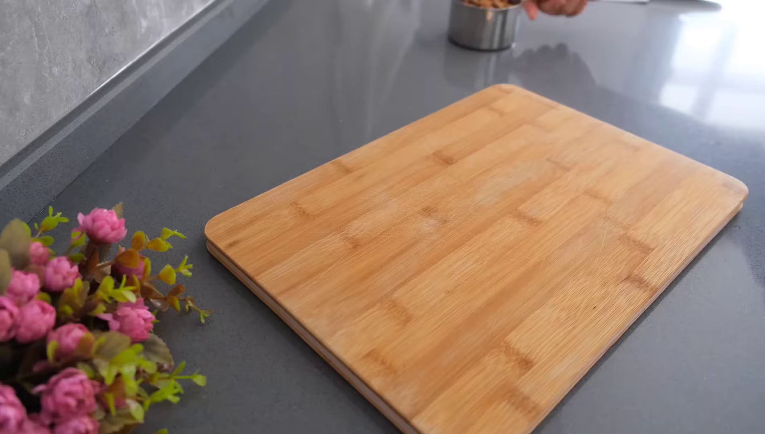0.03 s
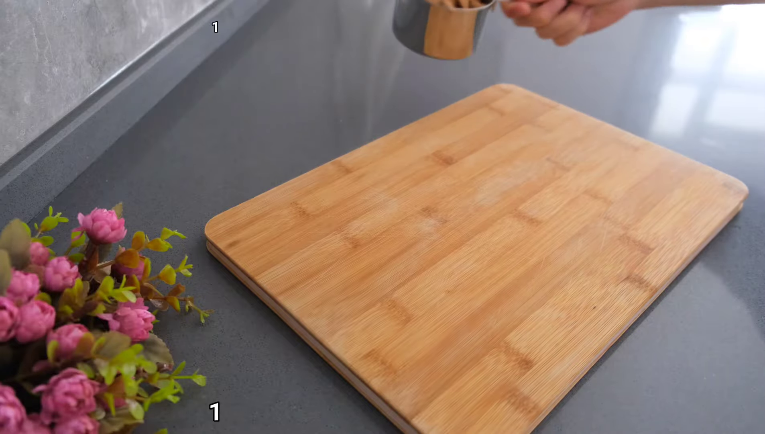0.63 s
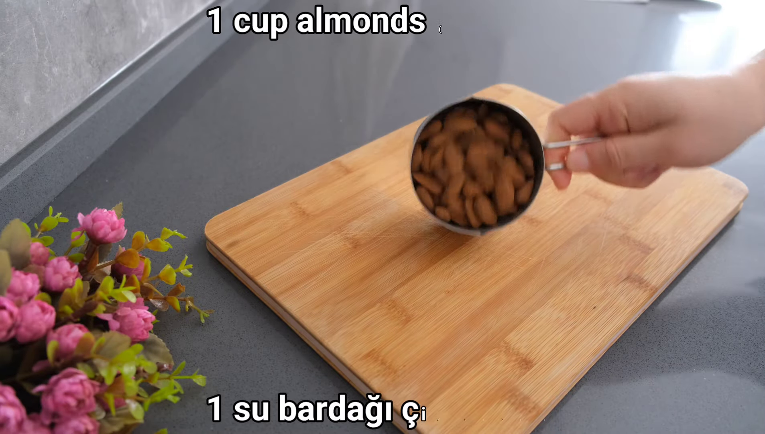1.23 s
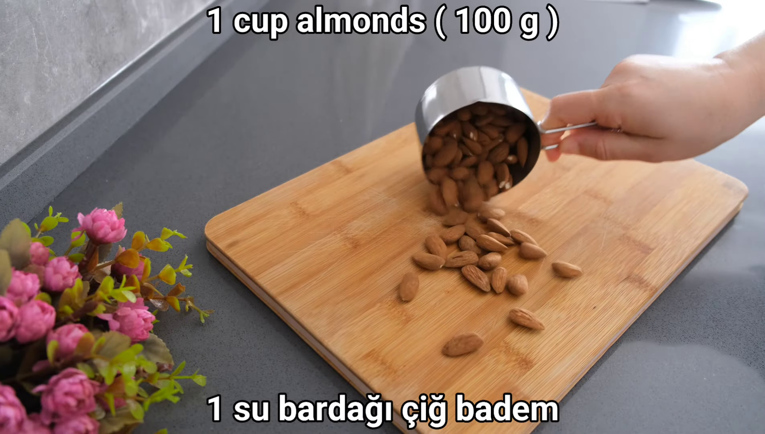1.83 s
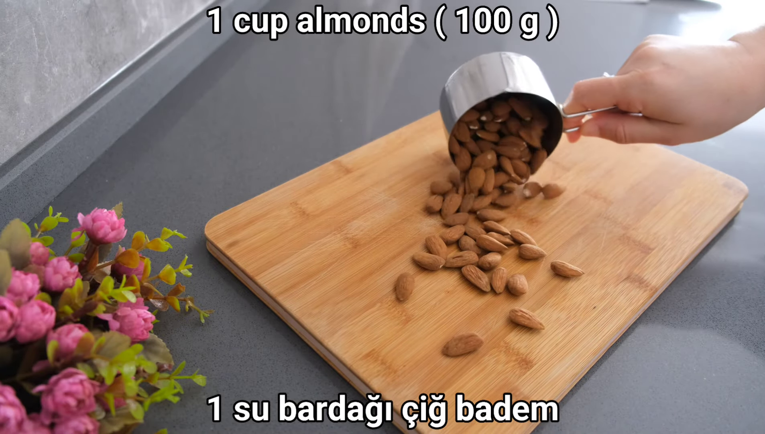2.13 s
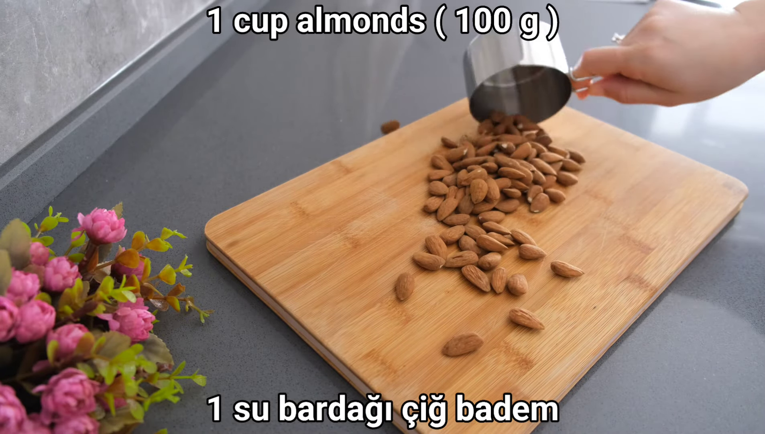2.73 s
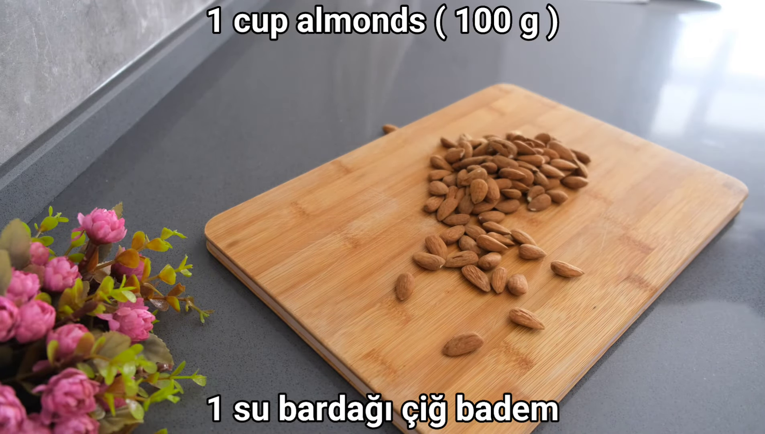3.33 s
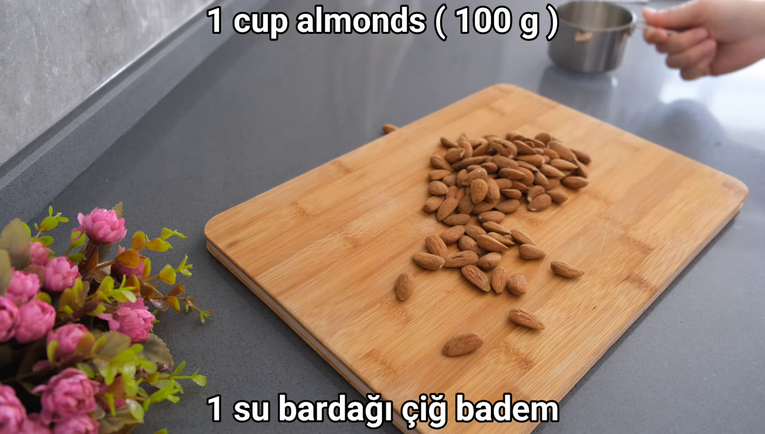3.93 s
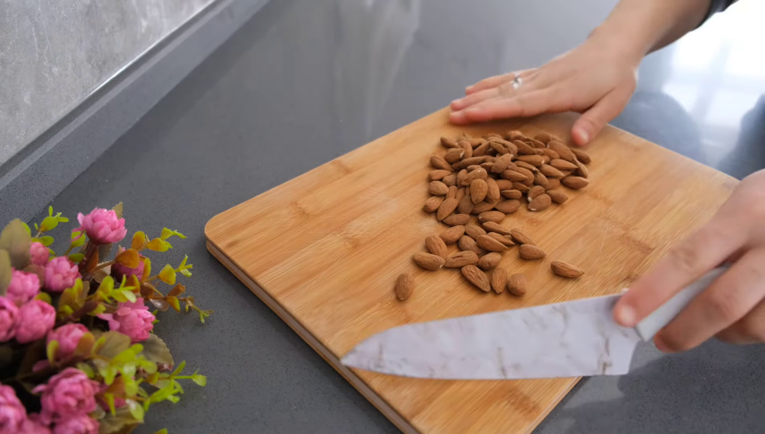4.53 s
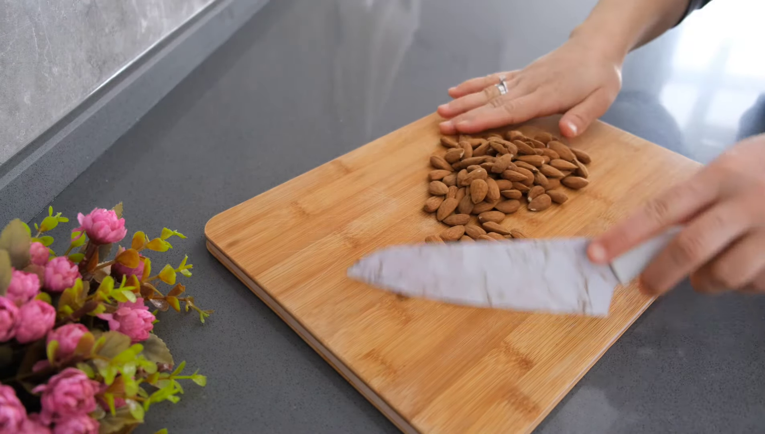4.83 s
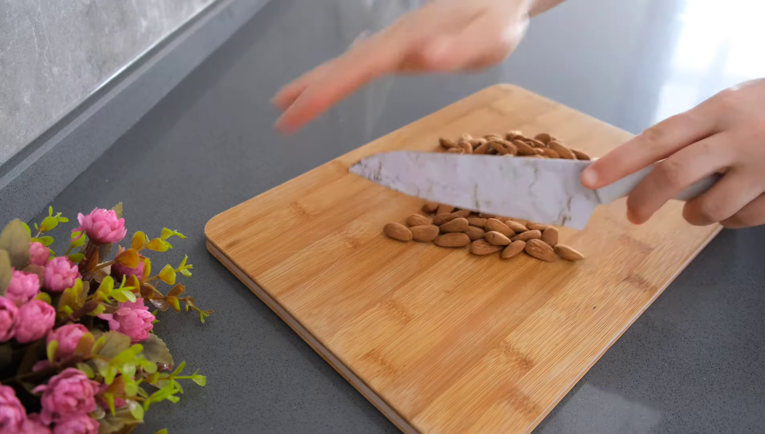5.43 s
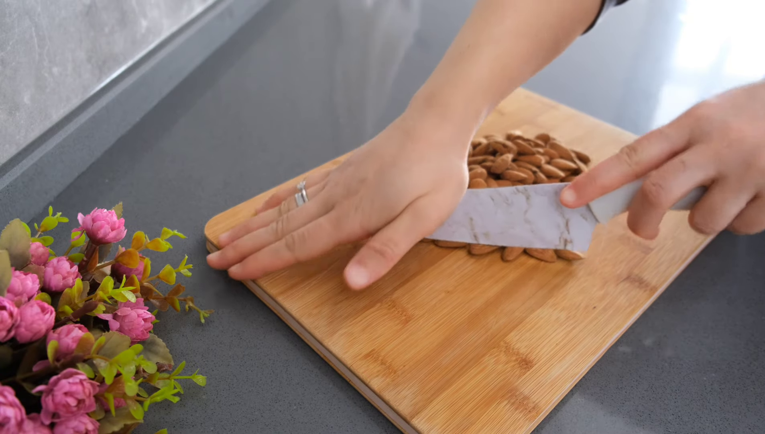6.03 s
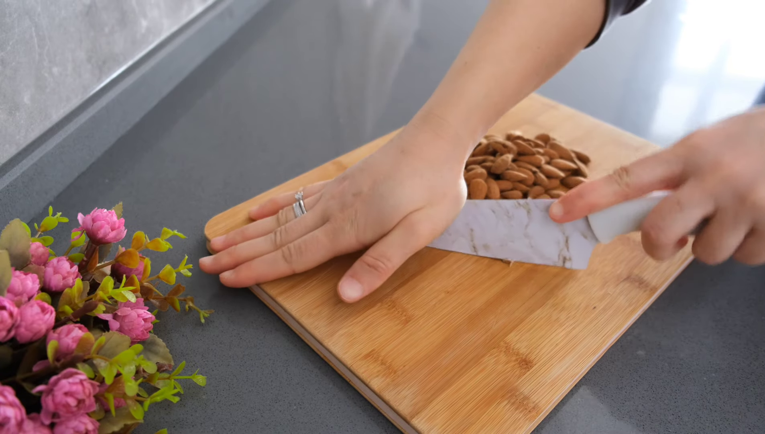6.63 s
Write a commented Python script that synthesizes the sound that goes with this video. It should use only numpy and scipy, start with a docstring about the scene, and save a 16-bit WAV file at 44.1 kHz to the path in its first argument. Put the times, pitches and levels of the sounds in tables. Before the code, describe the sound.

Almonds clatter from a steel cup onto a wooden board, the cup clinks down loudly, and a knife scrapes and presses the nuts.

```python
"""Almonds pour from a steel measuring cup onto a bamboo board, each impact exciting the board's modes.
First the full cup slides off a stone counter and knocks on the board; its rim sings by stick-slip friction.
Set down empty, it rings with a loud clink that overloads the close stereo microphone. A hand lands on the
board, then a knife blade sweeps the nuts together and is pressed flat on them, so that they grind and
crackle. Beneath it all are the air, soft worktop booms and short reverberation of a small kitchen."""
import sys
import numpy as np
from scipy import signal
from scipy.fft import rfft, irfft
from scipy.io import wavfile
from scipy.ndimage import uniform_filter1d

SR = 44100
rng = np.random.default_rng(int(sys.argv[2]) if len(sys.argv) > 2 else 0)


def master(y):
    """Save y as 16-bit WAV."""
    cut = np.clip(np.atleast_2d(y).T, -1, 1)
    pcm = np.round(cut * 32767)  # scale
    wavfile.write(sys.argv[1], SR, pcm.astype(np.int16))


N = 295470
TIME = np.arange(N) / SR

# Modes of the bamboo board and of the steel cup. Each row: frequency in Hz, level in dB, T60 in seconds.
BOARD = [(115, -1, 0.29), (171, -7, 0.26), (237, 0, 0.17), (274, -2, 0.26), (329.8, -1.5, 0.35),
         (396.5, -9, 0.33), (463, -11, 0.14), (679, 2.5, 0.081), (877, -0.5, 0.12), (933.6, -1, 0.17),
         (1190, -7.5, 0.07), (1523, 5.5, 0.081), (1684, 5.5, 0.036), (1900, -4, 0.085), (2290, -1.5, 0.052),
         (2492, -0.5, 0.047), (2900, -7, 0.085), (3460, 0.5, 0.04)]
CUP = [(988, -13, .6), (1055, -1, .8), (1076, -6, .8), (1330, -11, .65), (1593, -15, .55), (1858, -12, .7),
       (1886, -10, .85), (2966, -4, .85), (2996, -10, .7), (3908, -18, .75), (4371, -20, .55),
       (5432, -12.5, .7), (5600, -20, .5), (6045, -18, .58), (7251, -19, .46), (7903, -19, .55),
       (8818, -27, .5), (9372, -18, .35), (10240, -25, .42), (11080, -24, .35), (11910, -28, .45),
       (12330, -26, .42)]
# Contact noise spectra of wood, tumbling nuts and steel. Each row: frequency in Hz, level in dB.
WOOD = [(100, -2), (500, 4), (900, 9), (1250, 1.5), (1600, 4), (3300, 2.5), (5000, -4), (7500, -5),
        (10000, -10), (15000, -39)]
TUMBLE = [(100, -30), (480, -7.5), (900, 9), (1250, -1), (1600, 3), (3200, -6), (5000, -20), (8000, -17),
          (15000, -31)]
STEEL = [(2000, 5), (4500, 2), (7500, -6.5), (9800, -10.5), (12000, -10.5), (15500, -19)]
# Stereo width at the microphone. Each row: frequency in Hz, level of side relative to mid in dB.
WIDTH = [(40, -20.5), (200, -12), (1100, -11.5), (2200, -5), (4000, -0.5), (8000, 0)]
# The cup's base meets the counter and chatters. Each row: start in seconds, peak level in dB.
CLINKS = [(4.0811, 3), (4.0841, 3.5), (4.0871, 0), (4.098, -15), (4.111, -14)]

TRICKLE_START_S, EMPTY_S, PILE_SETTLE_S = 1.46, 3.04, 0.18
SET_DOWN_S, SEAT_S = CLINKS[0][0], 6.134  # the cup lands on the stone; the blade seats on the nuts


def amp(db):
    """Decibels to amplitude ratio."""
    return 10 ** (np.asarray(db) / 20)


def unit(x):
    """Normalisation to unit energy."""
    return x / np.sqrt(np.sum(x ** 2))


def colour(x, spectrum, size=4096):
    """Minimum-phase filter through (Hz, dB) points, built by folding the cepstrum."""
    hz, db = np.transpose(spectrum)
    grid = np.linspace(1, SR / 2, size // 2 + 1)
    gain = amp(np.interp(np.log(grid), np.log(hz), db))
    cepstrum = irfft(np.log(gain))
    response = irfft(np.exp(rfft(2 * cepstrum[:size // 2], size) - cepstrum[0]))
    return signal.fftconvolve(x, response[None], axes=1)[:, :x.shape[1]]


def band(x, low_hz, high_hz, order=2):
    """Band limiting by a high-pass and a low-pass in cascade."""
    for hz, kind in ((low_hz, "high"), (high_hz, "low")):
        x = signal.lfilter(*signal.butter(order, min(hz, SR / 2 - 1000), kind, fs=SR), x)
    return x


def noise(count):
    """Partly coherent stereo noise: alike in the bass, unrelated in the treble."""
    mid, side = rng.standard_normal((2, 1, count))
    side = colour(side, WIDTH, size=512)
    return np.vstack([mid + side, mid - side])


def wander(t, per_s):
    """Slow random modulation with a spread near 1, turning per_s times a second."""
    turns = rng.standard_normal(2000)
    return np.interp(t * per_s, np.arange(len(turns)), turns)


def crack(spectrum, t60, count=5000):
    """Contact transient: a burst of coloured noise with exponential decay."""
    burst = noise(count) * amp(-60 * TIME[:count] / t60)
    return unit(colour(burst, spectrum, size=1024))


def ring(modes, scatter_db=3, damping=1, count=5000):
    """Modal superposition: damped sinusoids, weighted anew by every point of contact."""
    hz, db, t60 = np.transpose(modes)
    strength, polarity, side = rng.standard_normal((3, len(hz)))
    # high modes reach the two channels out of phase
    phase = np.sign(side) * np.arctan(amp(np.interp(hz, *np.transpose(WIDTH))))
    weights = np.sign(polarity) * amp(db + scatter_db * strength) * np.exp(1j * np.outer([1, -1], phase))
    poles = 2j * np.pi * hz - np.log(1000) * damping / t60
    decays = np.vander(np.exp(poles / SR), count, increasing=True)
    return unit((weights @ decays).imag)


def detuned(modes, share):
    """Loading shifts each natural frequency by a small random fraction."""
    return [(hz * (1 + share * rng.standard_normal()), db, t60) for hz, db, t60 in modes]


def stroke(s, hold_s, db, attack_s, release_s):
    """Envelope in dB: it gains 20 dB per attack_s up to time s, holds, then loses 20 dB per release_s."""
    rise, fall = (s - TIME) / attack_s, (TIME - s - hold_s) / release_s
    return db - 20 * np.maximum(np.maximum(rise, fall), 0)


def add(out, s, sound, peak_db):
    """Superposition: mix a sound in at time s, its mid signal peaking at peak_db."""
    start = int(s * SR)
    part = sound[:, :max(N - start, 0)]
    out[:, start:start + part.shape[1]] += part * amp(peak_db) / np.abs(sound.mean(0)).max()


def follow(x, level_db, window=2200):
    """Gain control: the running RMS of a sound follows a level in dB."""
    power = np.abs(uniform_filter1d(np.mean(x ** 2, axis=0), window))
    return x * amp(level_db) / np.sqrt(power + power.max() * 1e-5)


def grains(voice, level_db, per_s, spread_db, spots=5, window=2200, patchy_db=0, shifts_per_s=16):
    """Shot noise: tiny random contacts at several spots, each with its own voice, follow a level in dB."""
    start, end = np.flatnonzero(level_db > level_db.max() - 45)[[0, -1]]
    span, count = slice(start, end), end - start
    out = np.zeros((2, N))
    for _ in range(spots):
        at = np.flatnonzero(rng.random(count) < per_s / spots / SR)
        strength_db = spread_db * np.minimum(rng.exponential(size=len(at)), 4)
        drift_db = patchy_db * wander(TIME[at], shifts_per_s)  # lets the spots take turns
        clicks = np.zeros((1, count))
        clicks[0, at] = amp(strength_db + drift_db)
        out[:, span] += signal.fftconvolve(clicks, voice(), axes=1)[:, :count]
    out[:, span] = follow(out[:, span], level_db[span], window)
    return out


def room_air(level_db=-50.5):
    """Stationary noise: the air of the room, strongest in the bass."""
    # Spectrum of the air. Each row: frequency in Hz, level in dB.
    spectrum = [(15, -39.5), (25, -4), (54, -0.5), (191, -15), (286, -10), (363, -18), (588, -17.5),
                (769, -19), (1120, -20.5), (1390, -22.5), (15000, -50.5)]
    air = colour(noise(N), spectrum)
    return amp(level_db) * air / air.std()


def worktop_booms():
    """Structure-borne sound: the worktop booms dully as the cook moves."""
    # Swells of the worktop. Each row: time of full level in seconds, hold in seconds, level in dB.
    booms = [(0.164, 0.11, -41), (0.693, 0.11, -34.5), (0.966, 0.087, -35.5), (1.25, 0.027, -39.5),
             (2.79, 0.028, -39.5), (6.23, 0.03, -42.5), (6.403, 0.21, -50)]
    # Their spectrum. Each row: frequency in Hz, level in dB.
    spectrum = [(20, -65), (42, -17.5), (54, 7), (66, -10.5), (110, -13.5), (170, -32), (400, -87)]
    swells = [stroke(s, hold, db, attack_s=0.048, release_s=0.21) for s, hold, db in booms]
    return follow(colour(noise(N), spectrum), np.max(swells, axis=0))


def kitchen(dry, wet_db, low_hz=150, high_hz=5500, treble_hz=4000, body_t60=0.52, treble_t60=0.14):
    """Reverberation: hard walls close by add a short diffuse tail whose treble dies first."""
    t = TIME[:24000]
    echoes = noise(len(t))
    body = band(echoes, low_hz, treble_hz, order=1) * amp(-60 * t / body_t60)
    treble = band(echoes, treble_hz, high_hz, order=1) * amp(-60 * t / treble_t60)
    tail = band(body, low_hz, high_hz, order=1) + treble
    return dry + amp(wet_db) * signal.fftconvolve(dry, unit(tail), axes=1)[:, :N]


def knife_sweep(sweep_s=4.742, hold_s=0.32, gather_db_per_s=23):
    """Sliding friction: the edge stutters over the wood, and the blade's hiss grows as it gathers nuts."""
    # Modes of the blade. Each row: frequency in Hz, level in dB, T60 in seconds.
    blade_modes = [(2260, 3.5, 0.011), (3170, 0.5, 0.019), (4560, -3.5, 0.012), (5980, -7, 0.027),
                   (6350, -5, 0.026), (7650, -5, 0.008), (9600, -6, 0.018), (11530, -9.5, 0.017),
                   (13500, -7.5, .008), (15000, -14, .012)]

    def edge():
        return band(ring(BOARD) + amp(2) * crack(WOOD, t60=0.061), 237, 2840)

    def blade():
        # pitch and colour shift with the point that touches
        ringing = ring(detuned(blade_modes, 0.016), scatter_db=1.5)
        hiss = band(crack(WOOD, t60=0.032), 2450, 13900)
        return ringing + amp(-2) * hiss

    edge_db = stroke(sweep_s, hold_s, db=-37.5, attack_s=0.19, release_s=0.16)
    blade_db = stroke(sweep_s, hold_s, db=-42.5, attack_s=0.12, release_s=0.073)
    blade_db += gather_db_per_s * np.clip(TIME - sweep_s, 0, hold_s)
    return (grains(edge, edge_db, per_s=700, spread_db=3, patchy_db=2.5)
            + grains(blade, blade_db, per_s=2800, spread_db=1, spots=7, patchy_db=4.5))


def knife_press(seat_hold_s=0.072, attack_s=0.029, release_s=0.037, skin_fade_s=0.055):
    """Friction under load: the flat blade rubs into place, the nuts grind and their skins crackle."""
    # Modes of the blade lying on the nuts. Each row: frequency in Hz, level in dB, T60 in seconds.
    loaded_modes = [(294, -1, .07), (876, 5, 0.021), (1576, 4.5, .026), (2130, -9, .03),
                    (3270, -5.5, 0.022)]
    # Pushes of the palm. Each row: time in seconds, hold in seconds, grinding in dB, crackling in dB.
    pushes = [(6.397, 0.0087, -40, -58.5), (6.478, 0.024, -50, -55), (6.583, 0.026, -36.5, -52.5)]

    def blade():
        return ring(loaded_modes, scatter_db=0.5)

    def crunch():
        return band(ring(BOARD, damping=4.4) + crack(WOOD, t60=0.04), 172, 1800)

    def skin():
        return band(crack(STEEL, t60=0.026), 3500, 16000, order=1)

    seating_db = stroke(SEAT_S, seat_hold_s, -40.5, attack_s, release_s)
    seating_skins_db = stroke(SEAT_S, seat_hold_s, -57, skin_fade_s, skin_fade_s)
    # the hand keeps leaning on the blade between pushes
    leaning_db = stroke(SEAT_S, pushes[-1][0] - SEAT_S, -53.5, attack_s, release_s)
    grinds = [stroke(s, hold, db, attack_s, release_s) for s, hold, db, _ in pushes]
    crackles = [stroke(s, hold, db, skin_fade_s, skin_fade_s) for s, hold, _, db in pushes]
    grinding_db = np.max(grinds + [leaning_db], axis=0)
    skins_db = np.max(crackles + [seating_skins_db], axis=0)
    return (grains(blade, seating_db, per_s=830, spread_db=2.5, spots=3, window=900)
            + grains(crunch, grinding_db, per_s=700, spread_db=3.5, window=900)
            + grains(skin, skins_db, per_s=920, spread_db=-6))


def cup_slide(slide_s=0.236, hold_s=0.22, db=-49, lift_off_db=4.5, attack_s=0.13, release_s=0.027):
    """Roughness noise: the full cup rasps over the stone and drags harder just as it lifts off."""
    # Spectrum of steel sliding on stone. Each row: frequency in Hz, level in dB.
    spectrum = [(290, -46), (500, -16), (990, -10), (1060, 3), (1160, -16), (1260, 2), (3270, -23),
                (5860, -22), (15000, -28.5)]
    drawn_db = stroke(slide_s, hold_s, db, attack_s, release_s)
    lifted_db = stroke(slide_s + hold_s, 0, db + lift_off_db, attack_s, release_s)
    level_db = np.maximum(drawn_db, lifted_db)
    return grains(lambda: crack(spectrum, t60=0.025), level_db, per_s=1500, spread_db=-2)


def cup_clink(clack_t60=0.023, split_hz=13, still_s=4.43, still_t60=0.17):
    """Free vibration after impact: the empty cup clacks down, rings and rattles until it lies flat."""
    # Spectrum of a clack on stone. Each row: frequency in Hz, level in dB.
    stone = [(80, -21), (300, -14), (550, -17.5), (780, -14), (1050, 5), (1400, 1), (2100, -2),
             (3000, -7.5), (4000, -21.5), (6000, -23), (9000, -31), (15000, -35)]

    def choked(damping):
        # contact with the stone damps the cup's modes
        return band(ring(CUP, scatter_db=2.5, damping=damping), 400, 4500, order=1)

    def rattle():
        return choked(damping=14) + amp(-4) * crack(stone, clack_t60)

    out = np.zeros((2, N))
    for s, db in CLINKS:
        add(out, s, crack(stone, clack_t60) + amp(-6) * choked(damping=15), db)
    # the handle splits every mode into a close pair that beats
    twins = [(hz + split_hz * (0.5 + rng.random()), db - 8, t60) for hz, db, t60 in CUP]
    add(out, SET_DOWN_S, ring(CUP + twins, scatter_db=0, count=24000), peak_db=-15.5)
    rattle_db = stroke(CLINKS[2][0], hold_s=0, db=-33.5, attack_s=0.002, release_s=0.43)
    out += grains(rattle, rattle_db, per_s=600, spread_db=2, spots=3)
    return out * amp(-60 * np.maximum(TIME - still_s, 0) / still_t60)


def rim_squeaks(pitch_hz=1064, waver_hz=9, roughness=0.12):
    """Stick-slip friction wavers around the cup's lowest strong mode; the load of nuts soon damps it."""
    # The rim catches on wood and nuts. Each row: start in seconds, peak level in dB, length in seconds.
    rubs = [(1.91, -23.5, 0.011), (1.957, -25, 0.079), (2.028, -23, 0.025), (2.119, -19, 0.0021),
            (2.521, -24.5, 0.017), (2.55, -30, 0.057), (2.608, -20, 0.013), (2.779, -25.5, 0.025),
            (2.85, -17, 0.027), (2.876, -17.5, 0.01), (2.9, -23.5, 0.0069)]
    out = np.zeros((2, N))
    for s, db, length in rubs:
        swell = np.hanning(int(length * SR))
        hz = pitch_hz + waver_hz * wander(TIME[:len(swell)], per_s=43)
        tone = np.sin(2 * np.pi * np.cumsum(hz) / SR)
        force = swell * (tone + roughness * rng.standard_normal(len(swell)))
        add(out, s, signal.fftconvolve(force[None], ring(CUP, damping=8), axes=1), db)
    return out


def board_knocks(free_damping=1.25, held_damping=1.8, tick_db=-28, tap_edge_ratio=1.06):
    """Long contacts excite low modes: cup, hand and blade knock on the board, each with a small tick."""
    # Heavy blows. Each row: start in seconds, peak level in dB, lower and upper band edges in Hz.
    blows = [(1.2544, -7.5, 626, 1300), (1.2591, -14, 474, 1050), (2.794, -29, 90, 253),
             (4.6052, -19, 372.4, 990), (4.607, -19, 168, 570), (5.83, -37.5, 150, 1520),
             (6.2239, -17, 520, 1650), (6.229, -37, 80, 170), (6.41, -36.5, 80, 200),
             (6.394, -34.5, 120, 1840)]
    # Hard first touches of steel on wood. Each row: start in seconds, peak level in dB, pitch in Hz.
    taps = [(1.2546, -19, 2060), (4.6058, -34.5, 3100), (6.2238, -41, 2050)]
    out = np.zeros((2, N))
    for s, db, low_hz, high_hz in blows:
        damping = held_damping if s > SET_DOWN_S else free_damping  # a resting hand damps the board
        hit = ring(BOARD, scatter_db=2.5, damping=damping) + amp(-5) * crack(WOOD, t60=0.075)
        add(out, s, band(hit, low_hz, high_hz, order=4), db)
        add(out, s, crack(WOOD, t60=0.081), db + tick_db)
    for s, db, hz in taps:
        tap = band(crack(WOOD, t60=0.04), hz / tap_edge_ratio, hz * tap_edge_ratio, order=6)
        add(out, s, tap, db)
    return out


def flow_levels(hold_s=0.0067, trickle_db=-40.5, tip_attack_s=0.19):
    """Granular flow comes in batches over a trickle: envelopes in dB of tumbling, skidding and rustling."""
    # Each tip or shake of the cup lets go a batch. Each row: time of its height, build-up and settling
    # in seconds, tumbling level in dB, skidding level in dB.
    batches = [(1.375, 0.046, 0.04, -35, -29.5), (1.403, 0.016, 0.035, -43, -29),
               (1.61, 0.16, 0.54, -29.5, -40), (1.911, 0.022, 0.55, -33, -31),
               (2.424, 0.17, 0.31, -27.5, -30), (2.755, 0.1, 0.42, -35.5, -37.5),
               (2.872, 0.069, 0.13, -29, -38.5)]
    trickle = stroke(TRICKLE_START_S, EMPTY_S - TRICKLE_START_S, trickle_db, 0.1294, PILE_SETTLE_S)
    tumbles = [stroke(s, hold_s, db, build_s, settle_s) for s, build_s, settle_s, db, _ in batches]
    skids = [stroke(s, hold_s, db, build_s, release_s=0.082) for s, build_s, _, _, db in batches]
    tumbling_db = np.max(tumbles + [trickle], axis=0)
    # tumbling and rustle rise as the cup tips and die away once it is empty
    tip_s = batches[0][0]
    ceiling_db = stroke(tip_s, EMPTY_S - tip_s, tumbling_db.max(), tip_attack_s, PILE_SETTLE_S)
    rustle_share_db = stroke(tip_s, EMPTY_S - tip_s, -12, tip_attack_s, release_s=0.15)
    return np.minimum(tumbling_db, ceiling_db), np.max(skids, axis=0), tumbling_db + rustle_share_db


def almond_stream(tumbling_db, skidding_db, rustle_db):
    """Dense collisions merge into noise: nuts tumble on wood, rustle their skins and skid down steel."""
    # Modes of the cup's wall, damped by nuts. Each row: frequency in Hz, level in dB, T60 in seconds.
    wall_modes = [(2955, 4.5, 0.027), (4650, -3, 0.03), (6170, -9, 0.03), (7260, 1, 0.062),
                  (7570, 5.5, 0.057), (8810, -3.5, 0.065), (10770, -11, 0.036), (12540, -7, 0.025)]

    def tumble():
        click = crack(TUMBLE, t60=0.017)
        board = band(ring(BOARD, damping=1.3), 780, 4000, order=4)
        return click + amp(-4) * unit(board)

    def rustle():
        return band(crack(STEEL, t60=0.027), 3500, 15000, order=1)

    def skid():
        return ring(detuned(wall_modes, 0.012)) + amp(-1) * crack(STEEL, t60=0.012)

    return (grains(tumble, tumbling_db, per_s=240, spread_db=2, spots=6, patchy_db=2.5)
            + grains(rustle, rustle_db, per_s=1300, spread_db=0.5, spots=3, patchy_db=6, shifts_per_s=24)
            + grains(skid, skidding_db, per_s=1000, spread_db=1.5, spots=7, window=1400, patchy_db=9))


def bounces(tumbling_db, count=14, above_flow_db=8.5, spread_db=3):
    """Random impacts scale with the flow: rows of start in seconds, peak in dB, treble share in dB."""
    span_s = EMPTY_S + PILE_SETTLE_S - TRICKLE_START_S
    starts = TRICKLE_START_S + span_s * (np.arange(count) + rng.random(count)) / count
    strength_db, brightness_db = spread_db * rng.standard_normal((count, 2)).T
    peaks_db = np.interp(starts, TIME, tumbling_db) + above_flow_db + strength_db
    return list(zip(starts, peaks_db, -12 + 2 * brightness_db))


def almond_impacts(tumbling_db, contact_hz=3550, usual_treble_db=-18, db_per_octave=11, rebound_s=0.014):
    """Elastic impact: single nuts excite the board's modes; a harder, shorter contact sounds brighter."""
    # The loudest almonds, hitting the board or snapping on it.
    # Each row: start in seconds, peak level in dB, treble share in dB.
    nuts = [(1.109, -33, -13), (1.1758, -27.5, 13), (1.3143, -31, -15), (1.3364, -21.5, -12),
            (1.353, -26.5, -8), (1.3717, -20, -8), (1.4051, -24, -10), (1.4424, -12.5, -19.5),
            (1.45, -19, -18), (1.4636, -10, -11.5), (1.515, -16.5, -6), (1.5298, -16, -6),
            (1.5385, -9.5, -16), (1.5435, -10.5, -17), (1.5529, -11.5, -10), (1.5615, -15, -18),
            (1.5832, -17, -13), (1.5981, -12.5, -16), (1.6095, -12, -7.5), (1.6238, -16.5, -6),
            (1.632, -15, -10), (1.647, -15.5, -14), (1.6674, -20, -16), (1.677, -20, -16),
            (1.6864, -11.5, -21), (1.6937, -12.5, -5), (1.699, -17, -12), (1.7314, -19.5, -15),
            (1.7644, -10, -11), (1.8349, -12, -4), (1.8775, -24, -21), (1.9097, -13.5, -10),
            (1.9329, -16.5, -14), (2.0571, -27, -13), (2.1047, -24, -17), (2.1419, -14, 6),
            (2.169, -18.5, -9), (2.2733, -21, -14), (2.3275, -22, -14), (2.365, -16, -19),
            (2.4034, -12.5, -11), (2.4132, -10, -13.5), (2.4244, -11.5, -21), (2.442, -10, -4),
            (2.4576, -7, -13.5), (2.465, -12, -15), (2.485, -22, -4), (2.5056, -10.5, -7),
            (2.6397, -19, -9), (2.6548, -18.5, -9.5), (2.7356, -22.5, -21), (2.7596, -16.5, -12.5),
            (2.7739, -17, -9), (2.8224, -19.5, -21.5), (2.9182, -25, -21), (2.986, -27, -22),
            (3.0588, -23, -24), (3.0698, -12, -16.5), (3.092, -26, -22), (3.1065, -19, -13),
            (3.1284, -13, -2.5), (3.135, -21, -12), (3.1563, -19, -21), (3.2712, -32.5, -20),
            (4.7586, -22.5, -8), (5.0336, -23, -15.5), (5.0794, -28.5, -15), (6.2765, -31.5, -11),
            (6.409, -31, -19.5), (6.6945, -18.5, -5.5)]
    out = np.zeros((2, N))
    for s, db, treble_db in nuts + bounces(tumbling_db):
        hardness = 2 ** ((treble_db - usual_treble_db) / db_per_octave)
        kernel_hz = rng.uniform(1900, 3600)
        kernel = ring([(kernel_hz, 0, 0.012), (kernel_hz * 1.7, -4, 0.009)])
        # the growing pile muffles the board, until the blade presses nuts onto the wood
        muffling_db = np.interp(s, [TRICKLE_START_S, EMPTY_S, SEAT_S], [0, -5, 0])
        board = ring(BOARD, scatter_db=4) * amp(muffling_db)
        snap = crack(WOOD, t60=0.034) + amp(-2) * kernel
        body = amp(6) * board + amp(-4) * crack(TUMBLE, t60=0.058)
        hit = band(snap + body / np.sqrt(hardness), 1100, contact_hz * hardness, order=3)
        thud = amp(-16) * band(board, 70, 239)
        sound = hit + thud
        add(out, s, sound, db)
        add(out, s + rebound_s * (0.5 + rng.random()), sound, db - 11.5)  # it tips over and lands again
    return out


def scene():
    """Superposition: almonds, cup and knife, each with its share of reverberation, over the background."""
    tumbling_db, skidding_db, rustle_db = flow_levels()
    on_board = almond_impacts(tumbling_db) + board_knocks()
    on_board += almond_stream(tumbling_db, skidding_db, rustle_db)
    return (kitchen(on_board, wet_db=-8.5)
            + kitchen(rim_squeaks() + knife_sweep() + knife_press(), wet_db=-10)
            + kitchen(cup_clink() + cup_slide(), wet_db=-18, high_hz=2200)
            + room_air() + worktop_booms())


def record(dry, low_cut_hz=36, top_hz=15300, start_s=0.085, fade_s=0.0088, knee_order=6):
    """Saturation and band limiting: after a quick fade-in, peaks near full scale are flattened."""
    x = signal.lfilter(*signal.butter(2, low_cut_hz, "high", fs=SR), dry)
    x *= np.clip((TIME - start_s) / fade_s, 0, 1)
    x = x / (1 + x ** knee_order) ** (1 / knee_order)
    return signal.sosfilt(signal.ellip(8, 0.2, 70, top_hz, fs=SR, output="sos"), x)


dry = scene()
out = record(dry)
master(out)
```